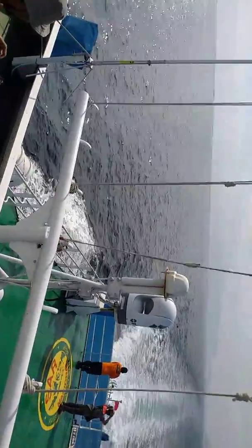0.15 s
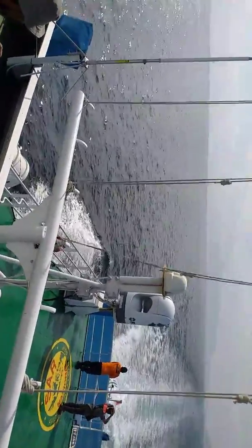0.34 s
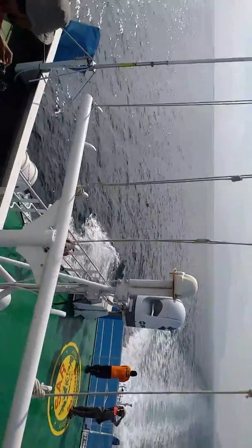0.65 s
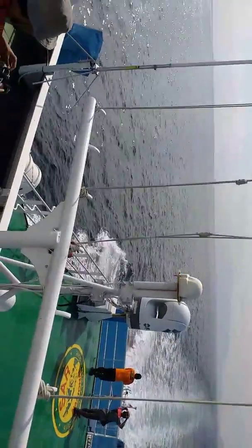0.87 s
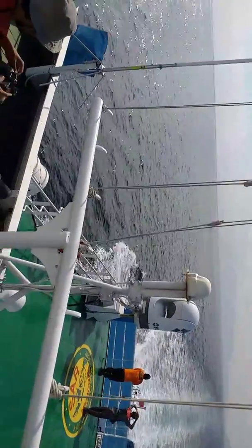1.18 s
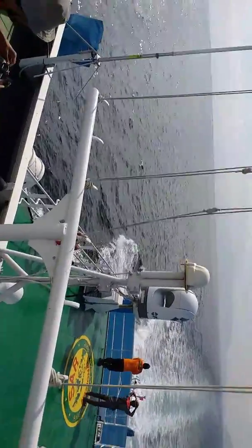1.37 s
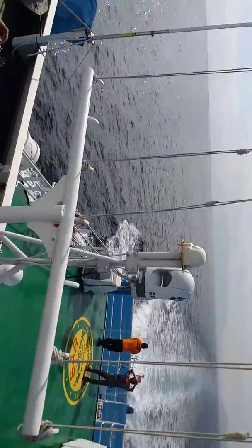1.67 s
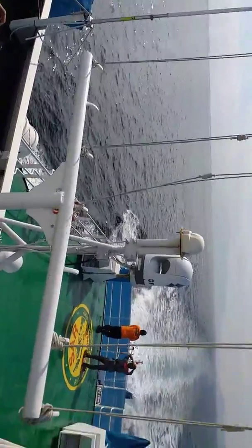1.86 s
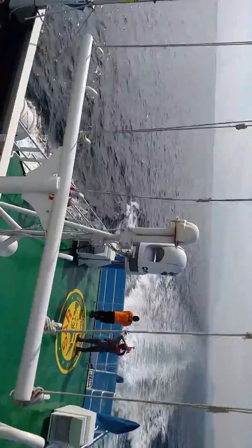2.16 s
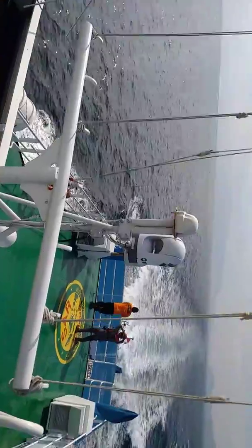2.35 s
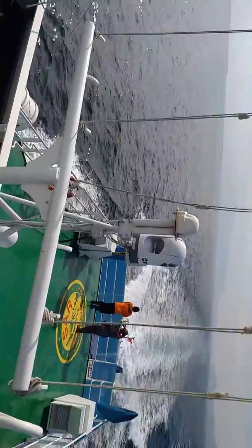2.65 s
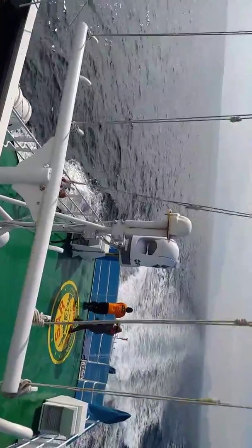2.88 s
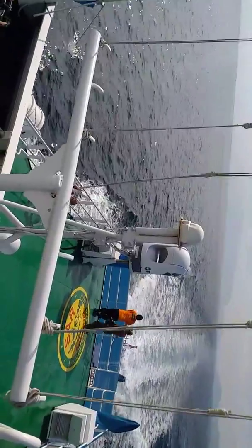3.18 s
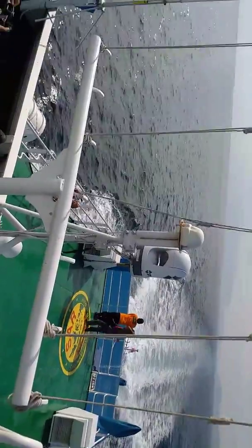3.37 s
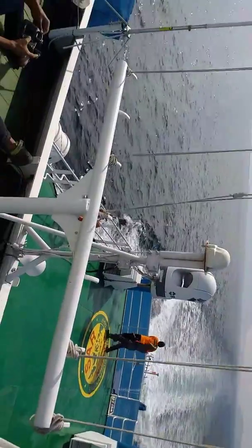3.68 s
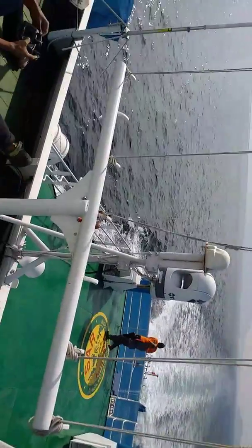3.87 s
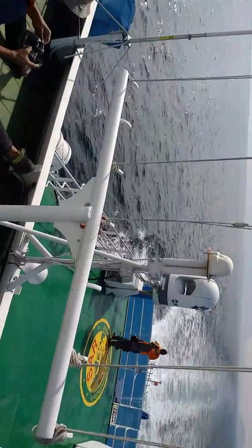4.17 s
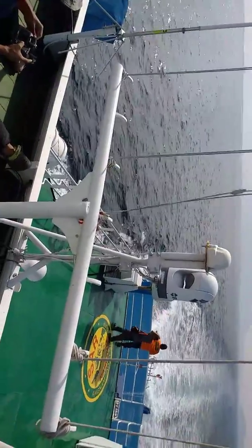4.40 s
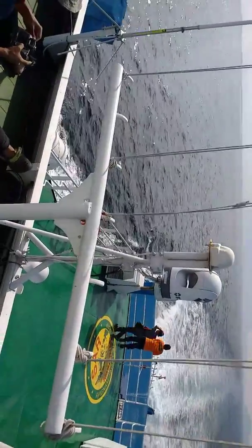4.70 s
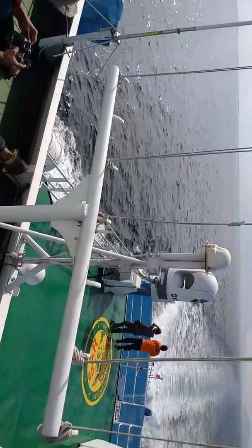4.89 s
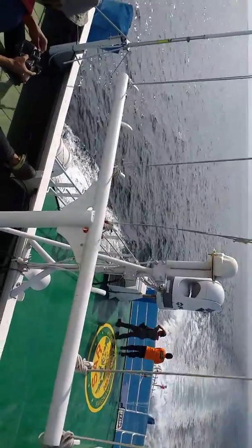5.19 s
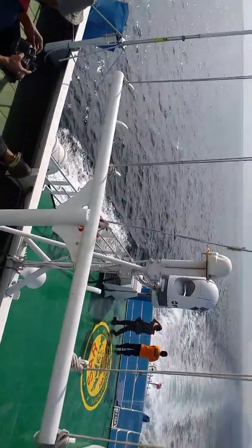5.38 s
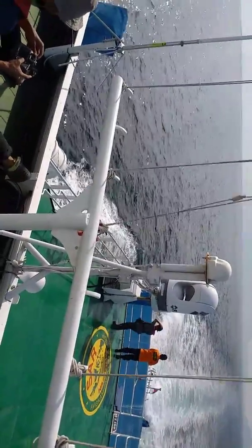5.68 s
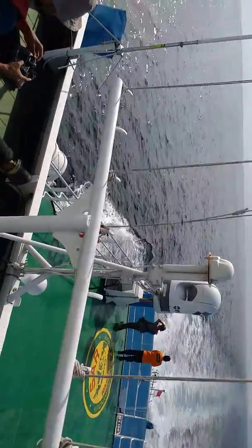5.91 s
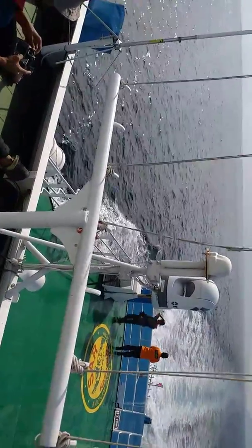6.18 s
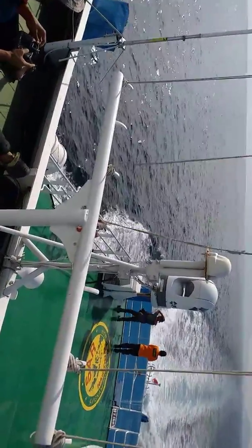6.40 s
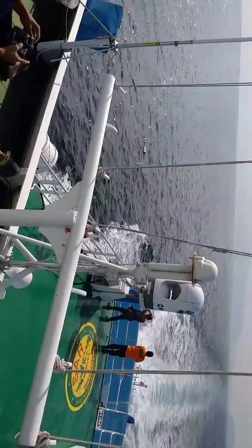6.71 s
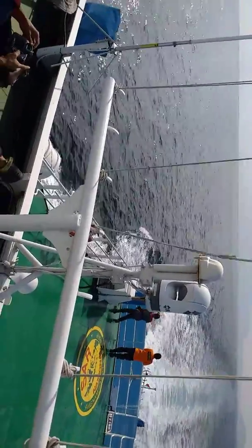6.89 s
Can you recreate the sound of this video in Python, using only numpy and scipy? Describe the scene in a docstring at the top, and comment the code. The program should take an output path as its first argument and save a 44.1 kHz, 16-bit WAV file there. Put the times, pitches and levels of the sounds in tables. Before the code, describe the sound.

High on a moving ship's open deck, a deep engine exhaust note of one low pitch drones throughout, repeatedly dipping and returning in the wind. Close on the phone's microphone, low rumble flutters and irregular gusts land as short hard thuds and raspy flaps, bunching near one second, again before three, and hitting hardest just after five. Behind, broken water rushes quietly along the hull with a thin foam fizz.

```python
"""The engine exhaust drones on one low note that fades in and out in the wind, heard from high on the open
deck of a ship under way: a wavering sine, with weaker machinery hums and a low noise from below deck.
Close on the phone's microphone, eddies tumble: noise makes the restless rumble, and swells of random pulses
make short, hard buffets, the strongest of which run into the limiter. Beyond, the wash along the hull is
two bands of surging noise, rush and foam fizz, with two faint high ticks."""
import sys
import numpy as np
from scipy import signal
from scipy.fft import rfft, irfft
from scipy.io import wavfile
from scipy.ndimage import uniform_filter1d, minimum_filter1d

SR = 44100
rng = np.random.default_rng(int(sys.argv[2]) if len(sys.argv) > 2 else 0)


def digitize_waveform(pressure):
    """Quantize a signal to 16-bit integers and store it at the path in sys.argv[1].

    Rows of a 2-D input are taken as channels; values are limited to [-1, 1].
    """
    field = np.atleast_2d(pressure).T
    bounded = np.clip(field, -1, 1)
    quanta = np.round(bounded * 32767).astype(np.int16)
    wavfile.write(sys.argv[1], SR, quanta)


N = 310905
TIME = np.arange(N) / SR

# Exhaust note as it reaches the deck, before its flutter: (time [s], rms level [dB])
EXHAUST_AT_DECK = [(0.0, -26), (0.06, -22.5), (0.33, -22.5), (0.39, -31), (0.45, -19), (1.08, -18),
                   (1.37, -37.5), (1.41, -16), (1.49, -31.5), (1.61, -21), (2.1, -19.5), (2.26, -27.5),
                   (2.77, -16.5), (2.81, -32), (2.85, -19.5), (3.18, -21), (3.34, -36.5), (3.57, -19),
                   (3.61, -25), (4.46, -24.5), (4.51, -18.5), (4.59, -26.5), (4.73, -23), (4.81, -32),
                   (4.91, -19.5), (5.63, -18.5), (5.77, -34), (5.91, -28), (5.95, -35), (6.07, -19),
                   (6.11, -35), (6.18, -22.5), (6.67, -20.5), (6.71, -26.5), (6.99, -24), (7.05, -29)]
# Weaker machinery tones, before their waver: (frequency [Hz], rms level [dB])
MACHINERY_HUMS = [(150.5, -36.5), (162, -47), (253, -54), (667, -54.5)]
# Spectrum of the machinery noise from below deck: (frequency [Hz], relative density [dB per Hz])
MACHINERY_SPECTRUM = [(25, -31.5), (60, -5), (110, 3.5), (160, -4.5), (230, -7), (350, -27.5), (800, -46)]
FIRING_HZ = 80.82


def engine(wander_rad=0.18, flutter_db=0.84, flutter_rate=6, machinery_db=-35, hum_waver_db=3,
           hum_wander_rad=0.96):
    """The exhaust note wavers as moving air bends its path; other machinery hums and rumbles below deck."""
    exhaust_db = curve(EXHAUST_AT_DECK) + flutter_db * walk(flutter_rate)
    exhaust_phase = 2 * np.pi * FIRING_HZ * TIME + wander_rad * walk(12)
    tones = np.sin(exhaust_phase) * undb(exhaust_db)
    for hz, db in MACHINERY_HUMS:
        hum_phase = 2 * np.pi * hz * TIME + hum_wander_rad * walk(3.8)
        tones += np.sin(hum_phase) * undb(db + hum_waver_db * walk(1.7))
    machinery = undb(machinery_db) * noise(MACHINERY_SPECTRUM)
    return np.sqrt(2) * tones + machinery  # root 2 turns sine peaks into rms levels


# Strong eddies, each one flap or thud on the microphone; buffets() trims the levels and stretches the lengths:
# (time [s], body level [dB], length [s], low thump re body level [dB], rasp re body level [dB])
STRONG_EDDIES = [(0.028, -19, 0.015, -0.5, -10), (0.057, -28, 0.018, 4, -9.5),
                 (0.365, -26.5, 0.012, 1, -16), (0.443, -28, 0.014, 10, -20),
                 (0.475, -23, 0.0083, -6, -12.5), (0.554, -23, 0.012, 3, -12),
                 (0.884, -25.5, 0.02, 12.5, -21), (0.938, -18.5, 0.018, 1.5, -3),
                 (0.962, -13, 0.0088, 2, -15), (0.976, -10.5, 0.0022, 8, 2), (0.994, -17, 0.017, 4, -12.5),
                 (1.266, -22.5, 0.01, -2.5, -11), (1.471, -24.5, 0.013, 6.5, -11),
                 (1.516, -26, 0.017, -3, -11.5), (1.561, -19, 0.0086, -3, -19),
                 (1.66, -24.5, 0.025, 7.5, -11), (1.879, -29, 0.017, -2.5, -27),
                 (2.229, -26.5, 0.012, 3, -25), (2.601, -28.5, 0.047, 4.5, -15.5),
                 (2.662, -23, 0.033, -2, -12), (2.695, -14.5, 0.0084, 4, -9.5),
                 (2.722, -21, 0.0064, -3, -13), (2.75, -26.5, .02, 10, -9), (2.787, -18, 0.018, 7, -14.5),
                 (3.014, -28.5, 0.0055, -2, -8.5), (3.388, -18.5, .009, -3.5, -12.5),
                 (3.557, -13, 0.0079, -7, -11), (3.589, -26.5, 0.019, 10, -12),
                 (3.652, -23, 0.0092, -10, -25), (3.672, -16, 0.0035, -8, -5.5),
                 (3.683, -14, 0.014, 1.5, -11), (3.822, -33.5, 0.0072, 16.5, -25),
                 (3.917, -19.5, 0.031, -1.5, -14), (4.043, -23, 0.018, 3, -13),
                 (4.196, -22.5, 0.016, -7, -12), (4.218, -25.5, .016, 4.5, -9),
                 (4.515, -26.5, .015, -9, -7), (4.597, -28.5, .025, 1, -16), (4.91, -21, 0.01, 4, -26),
                 (5.167, -7, .005, -5, -5), (5.188, -17, 0.0086, -3, -9.5), (5.41, -11.5, 0.0081, 3, -4.5),
                 (5.542, -19, .012, 8.5, -7.5), (5.572, -20.5, .019, -0.5, -14),
                 (5.613, -16.5, 0.011, 2, -9), (5.849, -16.5, 0.018, -17, -9),
                 (5.864, -20.5, 0.017, 0.5, -12.5), (6.042, -28, 0.028, -1, -16),
                 (6.086, -26, 0.012, -7, -11.5), (6.478, -24.5, 0.01, 9, -8.5), (6.496, -22, 0.0069, 4, -6),
                 (6.51, -21.5, 0.0056, -10, -2.5), (6.706, -24.5, 0.0064, 5, -9),
                 (6.875, -17.5, 0.019, -6.5, -9)]
# Spectra of the three parts of a buffet: (frequency [Hz], relative density [dB per Hz])
THUMP_SPECTRUM = [(25, -36.5), (50, -18), (90, 0), (150, 1), (230, -5), (330, -22), (600, -46.5)]
BODY_SPECTRUM = [(130, -20.5), (250, 0.5), (350, 1), (500, -3.5), (780, -11.5), (1100, -38.5), (2000, -54)]
RASP_SPECTRUM = [(450, -33), (820, 6), (1200, -3.5), (1900, -13), (2800, -26), (4200, -38), (7000, -69.5)]


def buffets(thump_trim_db=-1.5, body_trim_db=1, thump_stretch=1.78, rasp_stretch=0.84, thump_lag_s=0.00066,
            whirls_per_s=3000, sharpness_db=5.0):
    """A buffet is a quick run of whirls, each one pressure pulse on the diaphragm: thump, body and rasp."""
    whirls = (rng.random(N) < whirls_per_s / SR) * rng.standard_normal(N)
    thump = coloured(whirls, THUMP_SPECTRUM)
    body = coloured(whirls, BODY_SPECTRUM)
    sharpness = rng.standard_normal(N) * undb(sharpness_db * walk(120))
    rasp = coloured(whirls * sharpness, RASP_SPECTRUM)
    out = np.zeros(N)
    for at, db, length, thump_db, rasp_db in STRONG_EDDIES + small_eddies():
        parts = (
            strike(thump, at + thump_lag_s, length * thump_stretch, db + thump_db + thump_trim_db),
            strike(body, at, length, db + body_trim_db),
            strike(rasp, at, length * rasp_stretch, db + rasp_db),
        )
        for near, burst in parts:
            out[near] += burst
    return out


# Small eddies: level is relative to the wind rumble, thump and rasp to that level, before buffets() trims them
SMALL_PER_S, SMALL_LENGTH_S = 9, 0.014
SMALL_DB, SMALL_SPREAD_DB, SMALL_THUMP_DB, SMALL_RASP_DB = -4, 0.85, 3, -13


def small_eddies():
    """Light flaps come at uneven moments and grow with the wind; same columns as the strong eddies."""
    count = int(SMALL_PER_S * N / SR)
    chance = rng.random((count, 4))
    times = (np.arange(count) + chance[:, 0]) / count * TIME[-1]
    size, length, thump = np.sqrt(3) * (2 * chance[:, 1:].T - 1)  # uniform chance with spread 1
    wind_db = np.interp(times, TIME, curve(WIND_AT_MICROPHONE))
    db = wind_db + SMALL_DB + SMALL_SPREAD_DB * size
    lengths = SMALL_LENGTH_S * 2 ** (length / 2)
    thump_db = SMALL_THUMP_DB + SMALL_SPREAD_DB * thump
    return list(zip(times, db, lengths, thump_db, np.full(count, SMALL_RASP_DB)))


# Wind at the microphone between buffets, before its flutter: (time [s], rumble level [dB])
WIND_AT_MICROPHONE = [(0.0, -29), (0.68, -39), (1.6, -28), (1.67, -31), (1.97, -39.5), (2.32, -27.5),
                      (2.79, -29.5), (3.02, -30.5), (4.19, -31.5), (4.42, -26), (4.54, -24), (4.72, -32),
                      (5.03, -32), (5.3, -25), (5.56, -33), (6.3, -32), (6.73, -28.5), (7.0, -33.5)]
# Spectrum of the wind rumble: (frequency [Hz], relative density [dB per Hz])
RUMBLE_SPECTRUM = [(20, -40.5), (32, -28.5), (45, -11.5), (65, -2.5), (100, 2.5), (150, -5), (250, -10),
                   (400, -19.5), (700, -31.5), (1400, -42.5), (3000, -61.5)]


def rumble(flutter_db=5.0, flutter_rate=20):
    """The steady airflow sheds small eddies at the microphone all the time: low, fluttering noise."""
    level_db = curve(WIND_AT_MICROPHONE) + flutter_db * walk(flutter_rate)
    return noise(RUMBLE_SPECTRUM) * undb(level_db)


# Wash along the hull; of the rush only the swings about its median count, the fizz is before froth and sparkle:
# (time [s], rush level [dB], foam fizz level [dB])
WASH_ALONG_HULL = [(0.05, -56, -68.5), (0.82, -55, -68), (1.28, -54.5, -67), (1.5, -55.5, -67.5),
                   (1.94, -56.5, -70.5), (2.23, -56.5, -69), (2.4, -54, -66.5), (2.58, -54.5, -67),
                   (2.77, -54, -67), (3.33, -55, -68.5), (4.1, -55, -66.5), (4.62, -53, -64),
                   (4.89, -53.5, -65.5), (6.03, -56, -69.5), (6.84, -56.5, -69), (6.98, -52.5, -65.5)]
# Spectra of rush and fizz: (frequency [Hz], relative density [dB per Hz])
RUSH_SPECTRUM = [(100, -6), (300, -2.5), (520, -1.5), (800, -2.5), (1050, -3), (1300, -8), (1900, -9),
                 (2350, -12.5), (2800, -19.5), (4000, -22), (4900, -24), (6000, -36.5), (7500, -46.5),
                 (10000, -63)]
FIZZ_SPECTRUM = [(7000, -29), (8700, -12), (10300, -2.5), (11700, 2), (13300, -5), (15500, -14)]
# Resonances that colour the rush: (frequency [Hz], width [Hz], lift [dB])
RUSH_RESONANCES = [(656, 110, 4.5), (1506, 120, 3.5), (3410, 430, 3)]


def wash(rush_db=-40.0, surge=1.1, churn_db=0.64, froth_db=0.7, sparkle_db=0.5):
    """Broken water rushes beside the hull, and its foam fizzes as it churns."""
    rush_curve = curve(WASH_ALONG_HULL)
    surge_db = rush_curve - np.median(rush_curve)
    churn = walk(5.2)  # shared, so rush and fizz swell together
    rush_level_db = rush_db + surge * surge_db + churn_db * churn
    rush = noise(RUSH_SPECTRUM, RUSH_RESONANCES) * undb(rush_level_db)
    fizz_level_db = curve(WASH_ALONG_HULL, axis=2) + froth_db * churn + sparkle_db * walk(60)
    fizz = noise(FIZZ_SPECTRUM) * undb(fizz_level_db)
    return rush + fizz


# Faint high ticks: (time [s], level [dB], length [s], centre frequency [Hz])
FAINT_TICKS = [(1.211, -65, .014, 15000), (5.143, -50, 0.004, 4500)]


def ticks(skirt_db=-28):
    """Thin, short ticks, barely above the wash: swells of noise peaking at one pitch."""
    out = np.zeros(N)
    for at, db, length, hz in FAINT_TICKS:
        grain = noise([(hz / 2, skirt_db), (hz, 0), (hz * 2, skirt_db)])
        near, burst = strike(grain, at, length, db)
        out[near] += burst
    return out


def strike(turbulence, at, length, db, front=0.6, tail=0.45):
    """A swell of turbulence with a steep front and a slower tail, with rms db over its length."""
    t = (TIME - at) / max(length, .004)  # time in lengths
    near = np.flatnonzero((t > -2) & (t < 5))
    t = t[near]
    swell = np.where(t < 0, np.exp(-(t / front) ** 2), 1 / np.cosh(t / tail))
    burst = turbulence[near] * swell
    to_unit_level = np.sqrt(np.sum(swell ** 2) / np.sum(burst ** 2))
    return near, burst * undb(db) * to_unit_level


def noise(colour, peaks=()):
    """Smooth noise of rms 1 with a given spectrum."""
    return coloured(rng.standard_normal(N), colour, peaks)


def coloured(drive, colour, peaks=()):
    """Give a drive signal a spectrum and resonances; rms 1."""
    hz = np.maximum(np.arange(N // 2 + 1) * SR / N, 1)
    points = np.array(colour)
    db = np.interp(np.log(hz), np.log(points[:, 0]), points[:, 1])
    octaves_outside = np.abs(np.log2(hz / np.clip(hz, points[0, 0], points[-1, 0])))
    db -= 20 * octaves_outside  # beyond both ends, fall 20 dB per octave
    for centre, width, lift_db in peaks:
        db += lift_db / (1 + (2 * (hz - centre) / width) ** 2)
    y = irfft(rfft(drive) * undb(db), N)
    return y / y.std()


def walk(rate):
    """Smooth chance that changes about rate times a second; spread 1."""
    hz = np.arange(N // 2 + 1) * SR / N
    y = irfft(rfft(rng.standard_normal(N)) * np.exp(-.5 * (hz / rate) ** 2), N)
    return y / y.std()


def curve(table, axis=1):
    """One column of a control table at every sample."""
    rows = np.array(table)
    return np.interp(TIME, rows[:, 0], rows[:, axis])


def undb(db):
    """Decibels to gain."""
    return 10 ** (np.asarray(db) / 20)


def scene():
    """Ship, sea and wind at one microphone on the open deck."""
    return (engine() + buffets() + rumble() + wash() + ticks())[None]


def record(dry, low_cut_hz=36, ceiling=.7, top_hz=15650):
    """The microphone drops the deepest bass; a fast limiter holds the hardest buffets; the top is cut."""
    low_cut = signal.butter(2, low_cut_hz, "highpass", fs=SR, output="sos")
    heard = signal.sosfiltfilt(low_cut, dry)
    allowed = ceiling / np.maximum(np.abs(heard), ceiling)
    gain = uniform_filter1d(minimum_filter1d(allowed, size=150), size=150)  # sizes in samples
    top_cut = signal.ellip(8, .2, 70, top_hz, fs=SR, output="sos")
    return signal.sosfilt(top_cut, heard * gain)


dry = scene()
out = record(dry)
digitize_waveform(out)
```